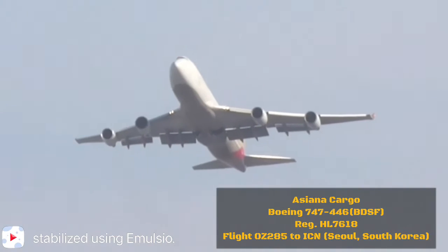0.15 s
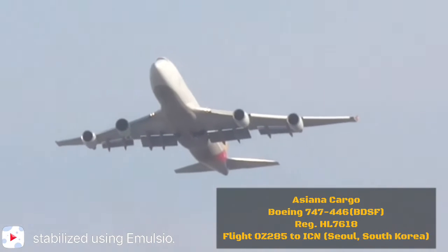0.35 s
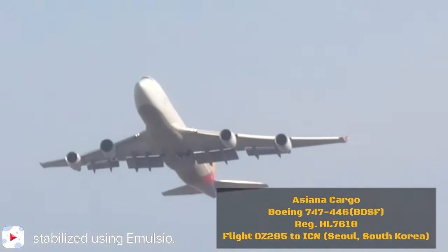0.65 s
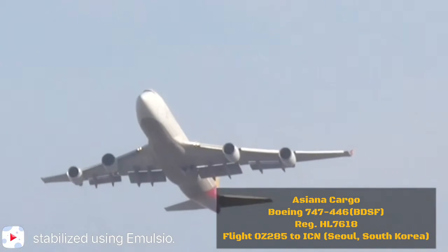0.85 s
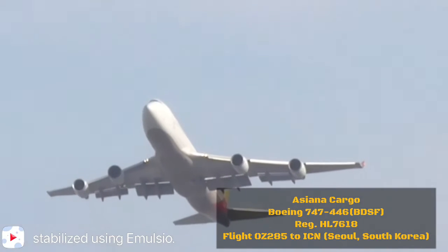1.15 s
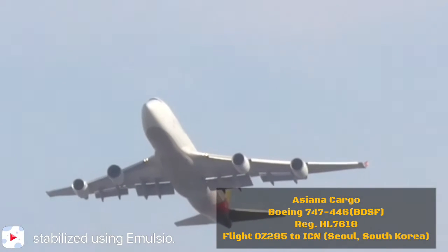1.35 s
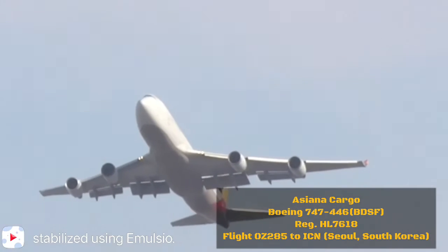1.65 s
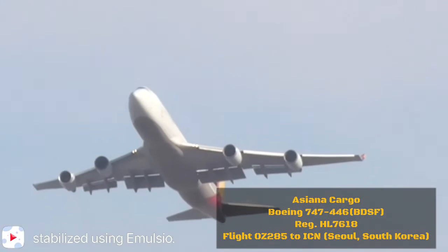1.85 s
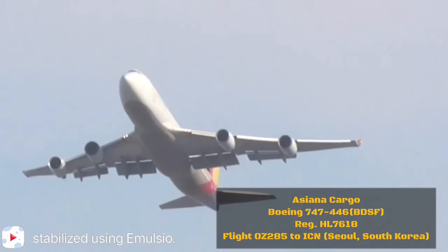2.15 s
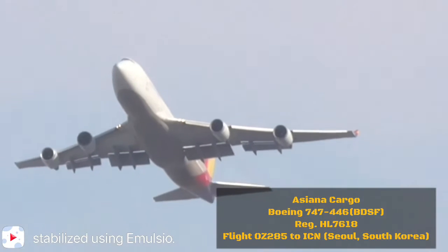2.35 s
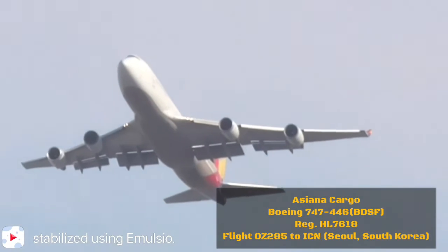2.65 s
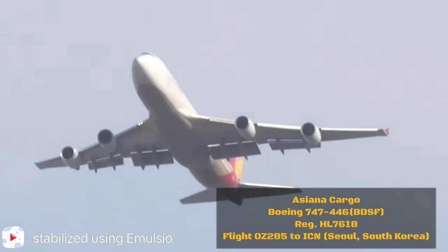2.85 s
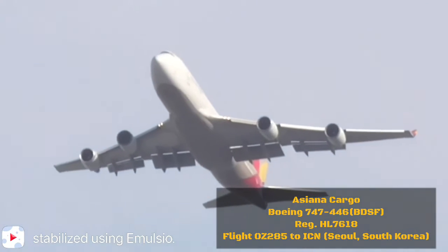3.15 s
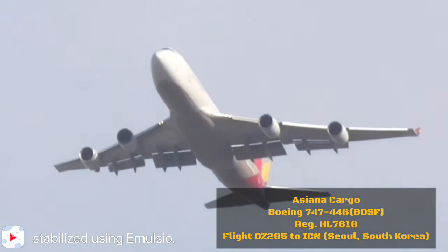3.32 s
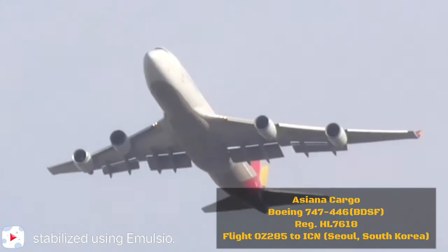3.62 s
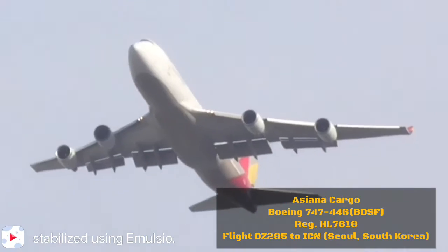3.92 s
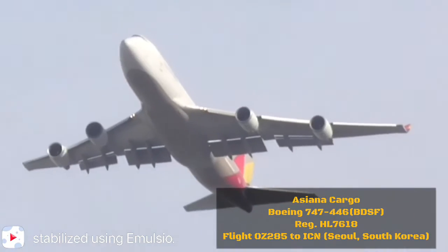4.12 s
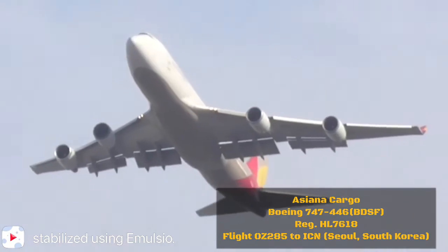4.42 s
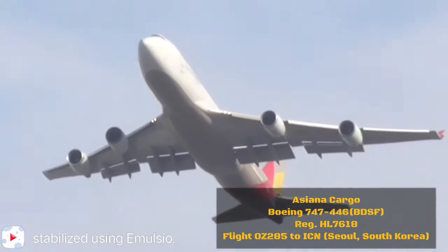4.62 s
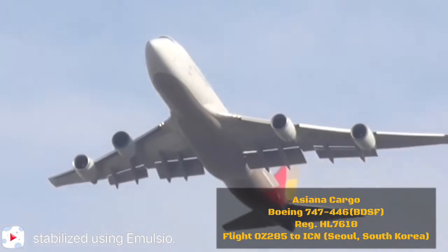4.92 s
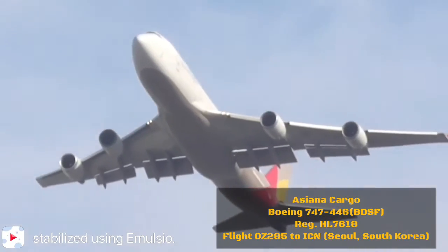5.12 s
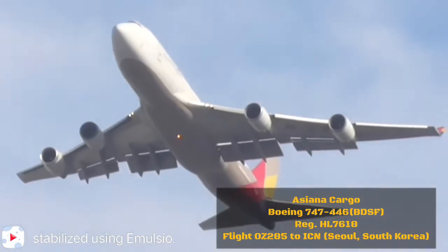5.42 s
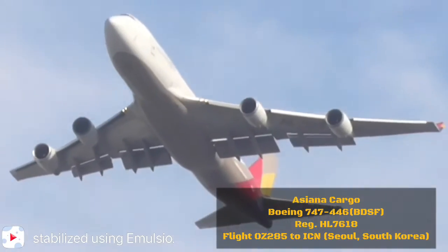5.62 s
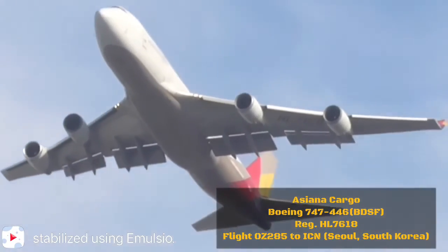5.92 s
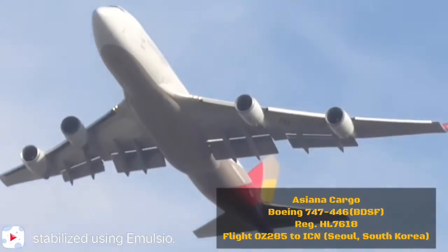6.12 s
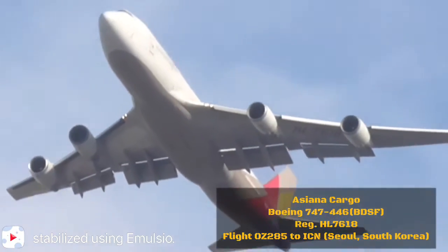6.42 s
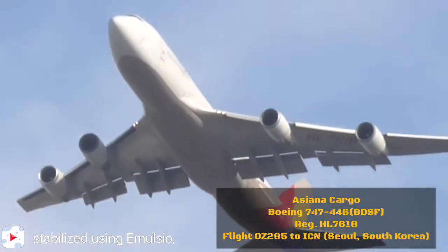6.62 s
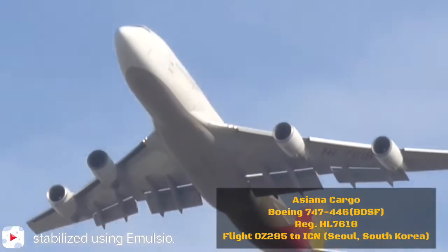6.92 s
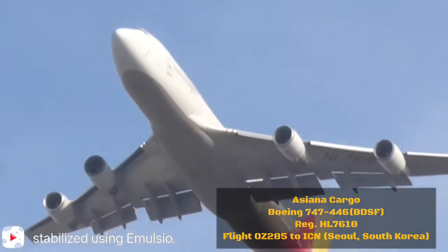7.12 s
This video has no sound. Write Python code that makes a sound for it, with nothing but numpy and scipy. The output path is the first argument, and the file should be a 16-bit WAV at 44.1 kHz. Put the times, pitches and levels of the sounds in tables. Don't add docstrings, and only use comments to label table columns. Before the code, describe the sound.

A heavy four-engine jet climbs toward overhead in open air, heard on a handheld stereo microphone. At 0 s the roar is moderate, dark and broad, mostly low and low-mid noise, with a very faint high bird chirp in the first 0.13 s. It sags around 0.7-1.3 s, then rises from 2 s to a strong swell at 4.1 s, dips slightly near 4.5 and 6 s, and is loudest around 7 s. A drone near 115 Hz beats beneath, nearly vanishing at 0.6 and 2.3 s, fuller near 3 and 5.5 s. Around 2.9 s the microphone turns to face the aircraft. Later, hollow ground-echo phasing slides downward. A short bright gust at 6.2 s exposes buzz; thin steady-pitched whine near 3 kHz flickers from 5.9 s. Faint roadside and leaf hiss continues, leaning left. Tiny handling clicks fall at 5.05, 5.55 and 7.2 s.

```python
import sys
import numpy as np
from scipy import signal
from scipy.fft import rfft, irfft, next_fast_len
from scipy.io import wavfile
from scipy.ndimage import uniform_filter1d, map_coordinates

SR = 44100
rng = np.random.default_rng(int(sys.argv[2]) if len(sys.argv) > 2 else 0)


def volts(x):
    e = np.asarray(x, float) / 20
    return 10 ** e


def digitize_waveform(pressure):
    field = np.atleast_2d(pressure).T
    bounded = np.clip(field, -1, 1)
    quanta = np.round(bounded * 32767).astype(np.int16)
    wavfile.write(sys.argv[1], SR, quanta)


N = 320607
T = np.arange(N) / SR

# (time [s], loudness [dB], clearness of the air path [dB])
ROAR = [(0, -21.5, -0.5), (.15, -23, -1.5), (.35, -22.5, -0.5), (.7, -25, 1), (1.3, -25.5, 1),
        (1.8, -23.5, 1), (2.3, -21.5, -1), (2.55, -20.5, -0.5), (2.8, -20, 0), (3.4, -17, -.5),
        (4.1, -14.5, -0.5), (4.55, -16, 0.5), (5.2, -14.5, -0.5), (5.7, -17, 0), (6.06, -18, -0.5),
        (6.24, -15.5, 1), (6.5, -14, 0), (6.95, -13.5, 1), (7.27, -14, 0)]
# (frequency [Hz], density [dB per Hz])
ROAR_COLOUR = [(12, -59), (20, -39.5), (80, -6), (103, -3.5), (141, -3.5), (225, -0.5), (272, 0.5),
               (422, -4.5), (630, -5), (1040, -13), (1370, -18.5), (1690, -30.5), (1960, -30), (2520, -42),
               (3050, -49.5), (3960, -58.5), (6710, -120)]
SPLITS_HZ = [150, 420, 1100]
# (share [dB], growth with loudness [dB/dB], gain with clearness [dB/dB])
RANGES = [
    (-13, 1.13, 0),
    (-3.5, 1.13, -1),
    (-6, 0.82, 0.62),
    (-16, 0.68, 0.8),
]
# (time [s], width [s], level [dB])
RUMBLE_SWELLS = [(.3, 0.18, -5.5), (.85, .1, -5), (1.8, 0.16, 2), (2.35, .08, -2), (2.9, 0.09, 0.5),
                 (4.0, 0.18, -1), (4.45, 0.048, -8.5), (4.85, .06, -1), (5.3, 0.15, 3), (5.85, .2, 4),
                 (6.6, .1, 0)]
# (time [s], width [s], level [dB])
BODY_SWELLS = [(3.66, .08, -0.5), (6.1, .05, -1.5), (.05, 0.071, -4), (.55, 0.068, 1.5), (2.3, 0.08, -1),
               (3.9, 0.055, 0.5), (6.7, 0.088, -1), (6.97, 0.048, 1.5), (1.2, 0.085, 2), (2.45, 0.14, 2.5),
               (4.4, 0.07, 0), (5.2, 0.24, -0.5), (5.9, .1, 0), (6.25, 0.073, 0)]
# (time [s], width [s], level [dB])
TEAR_SWELLS = [(4, 0.084, -1.5), (4.3, .1, 4), (4.6, 0.074, -1), (5.36, 0.067, 1.5), (6.55, 0.13, 1),
               (1.17, 0.032, 0.5), (0.34, 0.1, 3.5), (2.25, 0.2, 4), (2.801, 0.13, 0), (4.7, 0.14, 0.5),
               (5.45, 0.098, -2.5), (6.35, 0.16, 2), (7.07, 0.073, 0)]
# (time [s], ground echo delay [ms], echo strength [0-1], scattered roar level [dB])
PATH = [(0, 2.1, 0.35, -32.5), (.8, 2.2, 0.1, -31), (1.2, 1.9, .05, -33.5), (2, 1.86, 0.05, -29.5),
        (2.6, 2.15, 0.26, -33.5), (3.6, 1.9, 0.2, -34.5), (4.1, 2.6, 0.3, -41), (4.3, 2.55, 0.3, -37.5),
        (4.8, 2.79, 0.31, -35), (5.1, 3.04, 0.3, -33.5), (5.75, 3.2, 0.4, -31), (6.05, 3.4, 0.25, -30.5),
        (6.3, 3.53, 0.74, -38.5), (6.65, 3.88, 0.53, -43.5), (6.95, 4.1, 0.5, -39.5),
        (7.27, 4.56, 0, -36.5)]
# (frequency [Hz], density [dB per Hz])
SCATTER_COLOUR = [(12, -61.5), (20, -21), (80, -17.5), (108, -3), (141, -10), (328, -0.5), (591, -3),
                  (863, -2), (1370, -10), (1770, -21.5), (3050, -30), (3960, -56), (6710, -120)]
# (time [s], frequency [Hz])
DRONE_HZ = [(0, 118.3), (1.8, 113.6), (4, 112.2), (5.4, 113), (7.27, 113.4)]
# (time [s], width [s], level [dB])
BEATS = [
    (.64, .07, -16),
    (1.28, .07, -8),
    (2.28, .08, -18),
    (3.1, .45, 4.5),
    (4.2, .3, -13),
    (5.5, .5, 2.5),
    (6.4, .2, -7),
    (7.05, .3, -6),
]
# (middle [s], length [s], level [dB])
FAN = [(5.96, .06, -65), (6.03, .04, -61), (6.172, .055, -53.5), (6.26, .05, -62), (6.575, .07, -57),
       (6.68, .04, -63), (6.755, .05, -60), (6.915, .08, -57), (7.04, .04, -63), (7.1, .03, -57),
       (7.19, .12, -63)]
# (frequency [Hz], time [s], width [s], level [dB])
BUZZ = [
    (1020, 6.2, .1, -30),
    (1020, 6.62, .07, -34),
    (1100, 6.13, .08, -30),
]
# (time [s], level [dB], lean to the left [dB])
HISS = [(0, -58.5, 1.5), (.9, -57.5, 7.5), (1.5, -54.5, 6.5), (2.3, -53.5, 6.5), (2.43, -49, 4),
        (2.9, -54.5, 2.5), (3.3, -54, 3.5), (3.7, -54, 0.5), (4.4, -54, 1.5), (5.3, -57.5, 3),
        (6.1, -55, -1.5), (6.5, -61.5, 2.5), (7.27, -53.5, 4)]
# (frequency [Hz], density [dB per Hz])
HISS_LOW = [(2100, -28.5), (2700, -13.5), (3300, 2.5), (3900, -1), (4600, -3.5), (5300, -13.5),
            (6200, -33.5)]
# (frequency [Hz], density [dB per Hz])
HISS_HIGH = [(4800, -19), (5700, -5.5), (6400, -0.5), (7200, 0.5), (8300, -0.5), (9500, -6), (11000, -12),
             (12500, -14), (14500, -24.5), (15300, -37)]
# (time [s], likeness [0-1])
HISS_ALIKE = [(0, .42), (2, .42), (3, .5), (4, .42), (4.8, .15), (7.27, .2)]
# (time [s], width [s], level of all hiss [dB], further level of fine hiss [dB])
HISS_LULLS = [(2.05, 0.39, -2, -2.5), (2.9, .12, 1.5, 0), (3.4, 0.13, -1.5, 0.5), (4.4, 0.14, -.5, -2.5),
              (5.15, .15, 0, 0.5), (5.9, 0.15, -0.5, -1.5), (6.6, 0.17, 0.5, 0.5), (7.15, .12, -2.5, 1)]
# (time [s], level [dB])
LEFT_HISS = [(0, -62), (1.3, -60.5), (2.1, -62), (2.8, -62), (3.6, -64), (4.2, -69), (4.9, -67),
             (5.3, -64.5), (6.6, -65), (7.27, -64)]
# (frequency [Hz], density [dB per Hz])
LEFT_COLOUR = [(3500, -40), (4200, -9), (4900, -1), (5300, 0), (5750, -3), (6300, -30), (7500, -120)]
# (time [s], frequency [Hz], level [dB])
CHIRP = [
    (0, 10500, -78),
    (.03, 10800, -67),
    (.08, 10450, -69),
    (.1, 11050, -67),
    (.12, 10800, -68),
    (.13, 10700, -100),
]
# (time [s], peak level [dB])
TICKS = [
    (5.046, -36.5),
    (5.051, -35),
    (5.545, -45),
    (7.225, -40),
]
# (frequency [Hz], density [dB per Hz])
SELF_NOISE = [(9000, -120), (11000, -25), (12800, -3), (14000, -0.5), (15300, -2), (16000, -120)]

TURN_S, TURN_LASTS_S = 2.9, .35
ASIDE_LEAN_DB, FACING_LEAN_DB, ASIDE_LAG_MS = 3.5, -1, -0.055
GRAZING_TOP_HZ, STEEP_TOP_HZ, STEEP_FROM_S = 940, 620, 6.7
WALL_ECHO_MS, WALL_ECHO, WALL_ECHO_FROM_S = 2.42, -0.1, 5.1
GUST_S, GUST_WIDE_S, GUST_DB, GUST_TOP_HZ = 6.2, .05, 10.5, 2350
SHADOW_HZ = 620
DRONE_DB, OCTAVE_DB, OCTAVE_FADES_DB_PER_S = -28, -1, 8
FAN_HZ, FAN_EDGE_S = 2982, .012
HISS_LOW_DB, HISS_HIGH_DB, HISS_DULLS_DB_PER_S = -1.1, -1.5, 0.22
HIGH_LEAN_DB, HIGH_LEAN_SHARE, HISS_LAG_MS = .3, .3, -.075
TOP_SIDE_HZ, TOP_LEAN_DB = 8400, -5
SELF_NOISE_DB = -78


def unit(x):
    return x / np.sqrt(np.mean(x ** 2) + 1e-20)


def along(points, hz):
    f, v = np.transpose(points)
    return np.interp(np.log(hz + 1), np.log(f + 1), v)


def curves(rows):
    s, *columns = np.transpose(rows)
    return [np.interp(T, s, column) for column in columns]


def wobble(rate):
    knots = rng.standard_normal(int(N * rate / SR) + 4)
    return map_coordinates(knots, [np.arange(N) * rate / SR])


def bump(s, wide_s):
    return np.exp(-.5 * ((T - s) / wide_s) ** 2)


def swells(rows):
    return sum(db * bump(s, wide_s) for s, wide_s, db in rows)


def onset(s, lasts_s):
    return 1 / (1 + np.exp((s - T) / lasts_s))


def sine(hz):
    return np.sin(2 * np.pi * np.cumsum(hz) / SR)


def filtered(x, response):
    m = next_fast_len(N + 8192)
    return irfft(rfft(x, m) * response(np.fft.rfftfreq(m, 1 / SR)), m)[..., :N]


def below(x, top_hz):
    return filtered(x, lambda hz: 1 / (1 + (hz / top_hz) ** 8))


def above(hz, split_hz):
    return 1 / (1 + (split_hz / (hz + 1)) ** 8)


def coloured(x, spectrum):
    return filtered(x, lambda hz: volts(along(spectrum, hz)))


def delayed(x, ms):
    return map_coordinates(x, [np.arange(N) - ms * SR / 1000], mode="mirror")


def lagged(ports, ms):
    return np.array([delayed(ports[0], ms / 2), delayed(ports[1], -ms / 2)])


def lean(db):
    return volts(np.array([db / 2, -db / 2]))


def patchy(patchy_db, channels):
    z = signal.stft(rng.standard_normal((channels, N)), nperseg=1024)[2]
    field = rng.standard_normal(z.shape[1:])
    field = uniform_filter1d(field, size=10, axis=0)
    field = uniform_filter1d(field, size=8, axis=1)
    return signal.istft(z * volts(patchy_db * unit(field)), nperseg=1024)[1][:, :N]


def pair(noise, spectrum, alike):
    turn = np.arccos(np.clip(alike, 0, 1)) / 2
    mid, side = coloured(noise, spectrum)
    mid, side = np.cos(turn) * mid, np.sin(turn) * side
    return unit(np.array([mid + side, mid - side]))


def turned_aside():
    return 1 - onset(TURN_S, TURN_LASTS_S)


def ground_comb(jet):
    echo_ms, echo, _ = curves(PATH)
    echo = np.clip(echo, 0, 1)
    grazing, steep = [filtered(jet, lambda hz: 1 / np.sqrt(1 + (hz / top_hz) ** 8))
                      for top_hz in (GRAZING_TOP_HZ, STEEP_TOP_HZ)]
    bounce = grazing + onset(STEEP_FROM_S, .25) * (steep - grazing)
    ground_echo = echo * delayed(bounce, echo_ms + 0.013 * wobble(4.3))
    both = (jet + ground_echo) / np.sqrt(1 + echo ** 2)
    return both + WALL_ECHO * onset(WALL_ECHO_FROM_S, 0.22) * delayed(bounce, WALL_ECHO_MS)


def roar_levels():
    loud_db, clear_db = curves(ROAR)
    mean_db = loud_db.mean()
    range_swells = [swells(RUMBLE_SWELLS), swells(BODY_SWELLS), swells(TEAR_SWELLS), 0]
    return [mean_db + db + grows * (loud_db - mean_db) + clears * clear_db + 0.73 * wobble(5) + swell_db
            for (db, grows, clears), swell_db in zip(RANGES, range_swells)]


def roar():
    heard = coloured(ground_comb(patchy(patchy_db=0.61, channels=1)[0]), ROAR_COLOUR)
    splits = [0, *SPLITS_HZ, np.inf]
    ranges = [filtered(heard, lambda hz: above(hz, low) - above(hz, high))
              for low, high in zip(splits[:-1], splits[1:])]
    rumble, body, tear, edge = [volts(db) * unit(x) for db, x in zip(roar_levels(), ranges)]
    gust = volts(GUST_DB * bump(GUST_S, GUST_WIDE_S)) - 1
    edge = edge + gust * below(edge, GUST_TOP_HZ)
    round_casing = below(tear, SHADOW_HZ)
    aside = turned_aside()
    ports = (tear - round_casing + edge) * lean(FACING_LEAN_DB + ASIDE_LEAN_DB * aside)
    return rumble + (body + round_casing) * lean(-.5)[:, None] + lagged(ports, ASIDE_LAG_MS * aside)


def shaft_drone():
    hz = curves(DRONE_HZ)[0] + 0.72 * wobble(6.18)
    level = volts(DRONE_DB + swells(BEATS) + 0.59 * wobble(13))
    octave = volts(OCTAVE_DB - OCTAVE_FADES_DB_PER_S * T)
    return level * (sine(hz) + octave * sine(2 * hz)) * lean(-.9)[:, None]


def fan_tone():
    flicker = sum(volts(db) * np.clip((length / 2 - np.abs(T - s)) / FAN_EDGE_S + .5, 0, 1)
                  for s, length, db in FAN)
    fan = flicker * volts(4 + 3.6 * wobble(40)) * sine(FAN_HZ + 5 * wobble(20))
    for hz, s, wide_s, db in BUZZ:
        fan = fan + volts(db + 1.7 * wobble(22)) * bump(s, wide_s) * sine(hz + 5 * wobble(15))
    return fan * lean(-1.6)[:, None]


def scatter():
    level = volts(curves(PATH)[-1] + 1.1 * wobble(3.3))
    return level * pair(patchy(patchy_db=3.0, channels=2), SCATTER_COLOUR, alike=0.033)


def hiss():
    db, lean_db = curves(HISS)
    alike, = curves(HISS_ALIKE)
    db = db + 0.48 * wobble(8) + swells([(s, wide_s, all_db) for s, wide_s, all_db, _ in HISS_LULLS])
    fine_db = swells([(s, wide_s, more_db) for s, wide_s, _, more_db in HISS_LULLS])
    high_db = db + HISS_HIGH_DB - HISS_DULLS_DB_PER_S * T + fine_db + .6 * wobble(9.3)
    low = pair(patchy(patchy_db=-0.3, channels=2), HISS_LOW, alike)
    low = volts(db + HISS_LOW_DB) * lean(lean_db) * lagged(low, HISS_LAG_MS * turned_aside())
    high = pair(patchy(patchy_db=.8, channels=2), HISS_HIGH, alike)
    high = volts(high_db) * lean(HIGH_LEAN_DB + HIGH_LEAN_SHARE * lean_db) * high
    top = filtered(high, lambda hz: above(hz, TOP_SIDE_HZ))
    return low + high - top + top * lean(TOP_LEAN_DB)[:, None]


def left_resonance():
    rustle = pair(patchy(patchy_db=1.1, channels=2), LEFT_COLOUR, alike=0)
    return volts(curves(LEFT_HISS)[0]) * rustle * lean(18)[:, None] / volts(9)


def bird():
    hz, db = curves(CHIRP)
    return volts(db) * sine(hz)


def ticks():
    out, t = np.zeros((2, N + SR)), np.arange(SR // 100) / SR
    for s, db in TICKS:
        start = round(s * SR)
        decay = volts(db - 60 * t / .009)
        out[:, start:start + len(t)] += decay * rng.standard_normal((2, len(t)))
    clicks = filtered(out[:, :N], lambda hz: 1 / (1 + (3600 / (hz + 1)) ** 4) / (1 + (hz / 9600) ** 6))
    return lean(3.6)[:, None] * clicks


def self_noise():
    return volts(SELF_NOISE_DB) * pair(rng.standard_normal((2, N)), SELF_NOISE, alike=.3)


def scene():
    aircraft = roar() + shaft_drone() + fan_tone()
    surroundings = scatter() + hiss() + left_resonance() + bird()
    return aircraft + surroundings + ticks() + self_noise()


def top_cut(x):
    return signal.sosfilt(signal.butter(12, 15140, fs=SR, output="sos"), x)


def record(dry):
    ceiling = 1.6
    soft = dry / (1 + np.abs(dry / ceiling) ** 4) ** (1 / 4)
    return top_cut(soft)


dry = scene()
out = record(dry)
digitize_waveform(out)
```